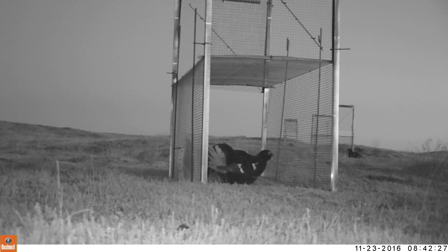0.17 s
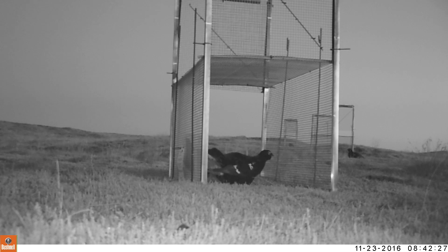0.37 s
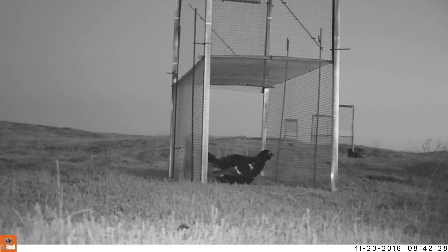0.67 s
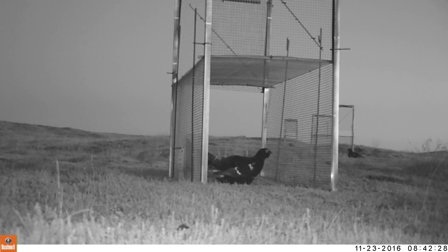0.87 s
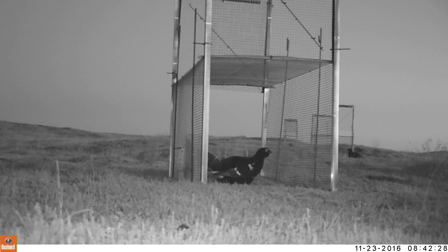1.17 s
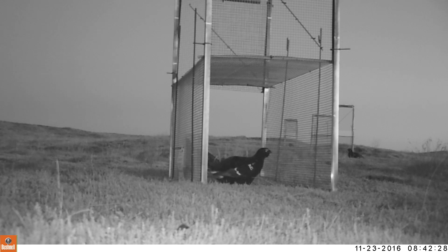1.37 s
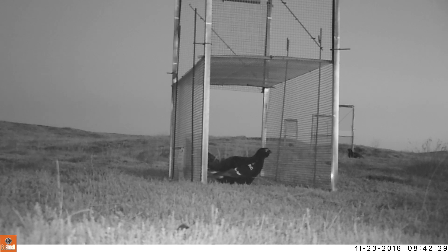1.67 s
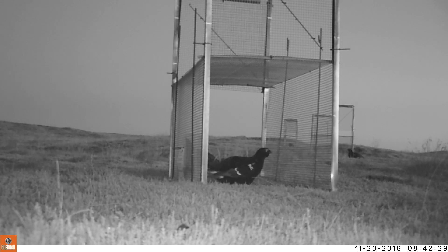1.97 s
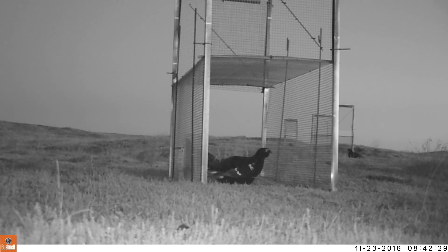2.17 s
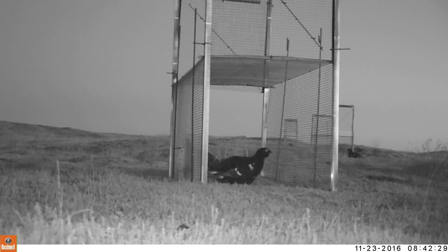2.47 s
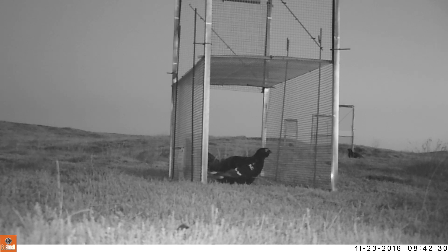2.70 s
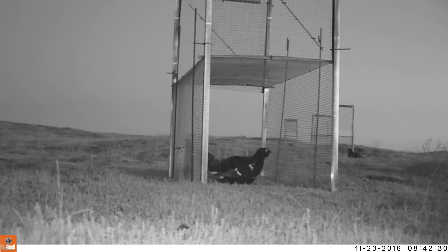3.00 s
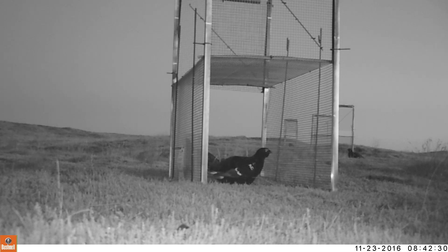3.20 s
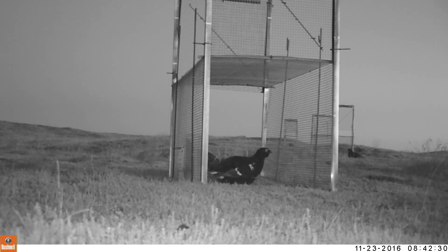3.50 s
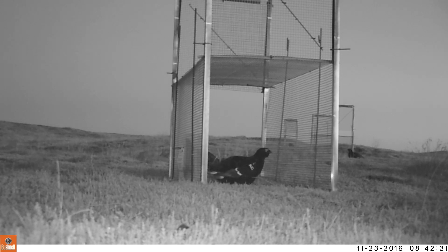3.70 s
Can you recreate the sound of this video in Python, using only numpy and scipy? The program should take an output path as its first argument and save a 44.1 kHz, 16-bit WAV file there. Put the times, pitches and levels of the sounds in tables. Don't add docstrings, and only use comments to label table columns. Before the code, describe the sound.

A grouse's soft, low bubbling coos over steady moorland wind, gusts and faint recorder hiss

```python
import sys
import numpy as np
from scipy import signal
from scipy.io import wavfile

SR = 44100
rng = np.random.default_rng(int(sys.argv[2]) if len(sys.argv) > 2 else 0)


def to_wav(sig):
    pcm = np.clip(np.atleast_2d(sig), -1, 1) * 32767
    pcm = np.round(pcm).astype(np.int16)
    wavfile.write(sys.argv[1], SR, pcm.T)


def gain_from_db(level_db):
    decades = np.asarray(level_db, float) / 20
    return 10 ** decades


N = 169785


def swell(t, length, attack, release):
    nearest_end = np.minimum(t / attack, (length - t) / release)
    return np.sin(np.pi / 2 * np.clip(nearest_end, 0, 1)) ** 2


def rms_one(x):
    return x / np.sqrt(np.mean(x ** 2) + 1e-20)


def drift(rate):
    r = np.exp(-80 * np.pi * rate / SR)
    white = rng.standard_normal(N // 40 + 2002)
    slow = signal.lfilter([1], [1, -2 * r, r * r], white)[2000:]
    return np.interp(np.arange(N) / 40, np.arange(len(slow)), rms_one(slow))


def at_hz(points, hz):
    table_hz, table_db = np.transpose(points)
    return np.interp(np.log(hz), np.log(table_hz), table_db)


def banded_noise(spectrum, patchy_db, rate):
    out, white = 0, rng.standard_normal((2, N + SR))
    lowest, highest = spectrum[0][0] * .9, spectrum[-1][0] * 1.2
    edges = 10 * 2 ** np.arange(0, 10.8, 1 / 3)
    for k, (low, high) in enumerate(zip(edges, edges[1:])):
        hz, flicker = np.sqrt(low * high), drift(rate)
        if lowest < hz < highest:
            sos = signal.butter(2, [low, high], "band", fs=SR, output="sos")
            band = signal.sosfilt(sos, white[k % 2])[SR:]
            out = out + gain_from_db(at_hz(spectrum, hz) + patchy_db * flicker) * band
    return rms_one(out)


def grouse():
    # (crest time [s], length [s], crest level [dB], crest pitch [Hz], octave partial [dB])
    coos = [(.048, .062, -64, 440, -15), (.16, .064, -59, 440, -13), (.264, .084, -59.5, 456, -12),
            (.538, .076, -55.5, 472, -14), (.65, .06, -60, 428, -11), (.764, .074, -58, 452, -11),
            (1.026, .08, -55, 476, -13), (1.138, .068, -59, 434, -13), (1.407, .078, -55.5, 464, -9),
            (1.523, .062, -59.5, 424, -8), (1.776, .068, -55.5, 446, -9), (1.89, .066, -60, 410, -5),
            (2.14, .07, -56, 441, -9), (2.25, .066, -59, 410, -5), (2.5, .066, -57, 432, -10),
            (2.624, .054, -62.5, 400, -5), (3.236, .055, -65, 410, -11)]
    crest_at, rise, fall = .38, .16, .62
    attack, release = .38, .36
    full_s = .075
    octave_trim_db, octave_grows_db = -2.0, 3.0
    third_db = -22.0
    waver_depth = .016
    out, waver = np.zeros(N + SR), np.append(drift(32), np.zeros(SR))
    for s, length, level_db, hz, octave_db in coos:
        t = np.arange(int(length * SR)) / SR
        i = int((s - crest_at * length) * SR)
        u = t / length - crest_at
        before = rise * abs(u / crest_at) ** 1.4
        after = fall * abs(u / (1 - crest_at)) ** 2.2
        arch = 1 - np.where(u < 0, before, after) * (length / full_s) ** 2
        pitch = hz * arch * (1 + waver_depth * waver[i:i + len(t)])
        phase = 2 * np.pi * np.cumsum(pitch) / SR
        overtones = np.sin(2 * phase + 1) + gain_from_db(third_db / 2) * np.sin(3 * phase)
        tone = np.sin(phase) + gain_from_db(octave_db + octave_trim_db + octave_grows_db * u) * overtones
        envelope = swell(t / length, 1, attack, release) ** .62
        out[i:i + len(t)] += gain_from_db(level_db + .8) * envelope * tone
    return out[:N]


def small_bird_ticks():
    # (time [s], peak level [dB], strongest pitch [Hz])
    ticks = [
        (2.7372, -61.5, 7560),
        (2.762, -56.5, 6990),
        (2.794, -63.5, 7000),
        (2.8465, -69, 7520),
        (2.876, -67.5, 6000),
        (3.4337, -63, 7730),
        (3.4601, -62, 6800),
        (3.4946, -66, 7700),
        (3.5322, -63.5, 6060),
        (3.5723, -69, 6000),
    ]
    # (frequency [Hz], level [dB], 60 dB decay time [s])
    tick_modes = [(6040, -1.5, 0.02), (7010, 1.2, .012), (7635, -2.3, 0.027), (8250, -4.5, 0.0073),
                  (5360, -10, .006), (8680, -4, .007), (4530, -7, .004)]
    lead_s, sweep_s_per_khz, off_pitch_db_per_khz, gain_db = .003, .0015, 6, 2.5
    out, t = np.zeros(N), np.arange(int(.012 * SR)) / SR
    for hz, mode_db, t60 in tick_modes:
        drive = np.full(N, 1e-18)
        for s, level_db, top_hz in ticks:
            i = int((s - lead_s + sweep_s_per_khz * (7600 - hz) / 1000) * SR)
            rasp = rng.standard_normal(len(t)) * swell(t, .009, .003, .005)
            at_mode = abs(rasp @ np.exp(2j * np.pi * hz * t))
            off_pitch_db = off_pitch_db_per_khz * abs(hz - top_hz) / 1000
            strike = gain_from_db(level_db + mode_db + gain_db - off_pitch_db)
            drive[i:i + len(t)] += strike * 1.34 * rasp / (at_mode + 4.9)
        r, w = gain_from_db(-60 / (t60 * SR)), 2 * np.pi * hz / SR
        out += signal.lfilter([0, np.sin(w)], [1, -2 * r * np.cos(w), r * r], drive)
    return out


def small_bird_whistles():
    # (time [s], length [s], level [dB], pitch [Hz], half width [Hz])
    whistles = [
        (.178, .034, -74, 7150, 300),
        (.182, .03, -79, 7800, 1200),
        (.255, .068, -84, 7100, 130),
    ]
    out, t = np.zeros(N), np.arange(N) / SR
    for s, length, level_db, hz, half_hz in whistles:
        sos = signal.butter(2, [hz - half_hz, hz + half_hz], "band", fs=SR, output="sos")
        breath = rms_one(signal.sosfilt(sos, rng.standard_normal(N)))
        out += gain_from_db(level_db) * swell(t - s, length, .008, .01) * breath
    return out


def wind_buffets():
    # (time [s], level [dB])
    gusts = [(0.03, -57), (0.19, -47), (0.36, -52.5), (0.69, -65.5), (0.89, -51), (0.98, -62.5),
             (1.3, -57.5), (1.54, -60), (2.13, -59), (2.4, -62.5), (2.8, -63.5), (3.04, -64), (3.4, -48.5),
             (3.85, -51)]
    # (frequency [Hz], level [dB per Hz])
    buffet_spectrum = [(10, 12.5), (22, -0.3), (45, -21), (90, -21)]
    push_db, push_hz, push_t60_s = -37.5, 17.0, .3
    t = np.arange(N) / SR
    gust_db = np.interp(t, *np.transpose(gusts))
    push = -gain_from_db(push_db - 60 * t / push_t60_s) * np.cos(2 * np.pi * push_hz * t)
    return gain_from_db(gust_db + 3.5) * banded_noise(buffet_spectrum, patchy_db=2.0, rate=2.4) + push


def air_rush():
    # (frequency [Hz], level [dB per Hz])
    rush_spectrum = [(18, -32.5), (30, -7.5), (147, -21), (187, -23.5), (287, -27.5), (372, -31.5),
                     (400, -33), (1010, -36.5), (2500, -65), (3250, -67), (5500, -120)]
    return gain_from_db(-57) * banded_noise(rush_spectrum, patchy_db=0.33, rate=12.0)


def scene():
    birds = grouse() + small_bird_ticks() + small_bird_whistles()
    return (birds + wind_buffets() + air_rush())[None]


def recorder_hiss():
    # (frequency [Hz], level [dB per Hz])
    hiss_spectrum = [(880, -36), (1500, -2), (3940, -6.5), (9000, -10), (11500, -12), (14500, -11.5)]
    return gain_from_db(-75.5) * banded_noise(hiss_spectrum, patchy_db=0.15, rate=14.0)


def band_limit(x):
    return signal.sosfilt(signal.butter(12, 13910, fs=SR, output="sos"), x)


def record(dry):
    mix = dry + recorder_hiss()
    return band_limit(mix)


dry = scene()
out = record(dry)
to_wav(out)
```